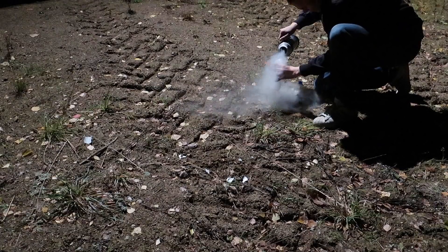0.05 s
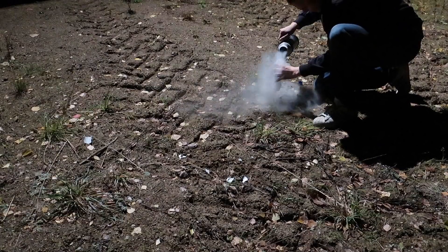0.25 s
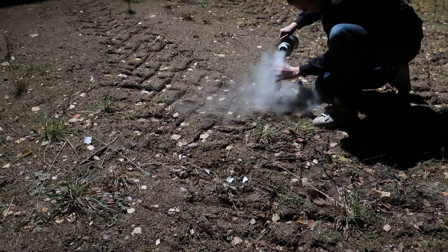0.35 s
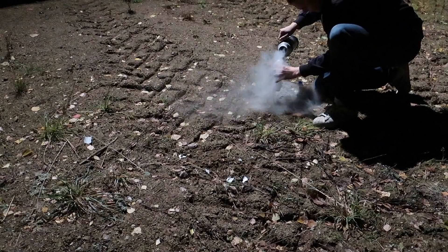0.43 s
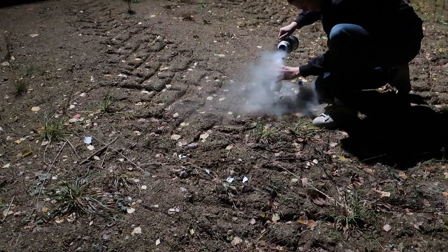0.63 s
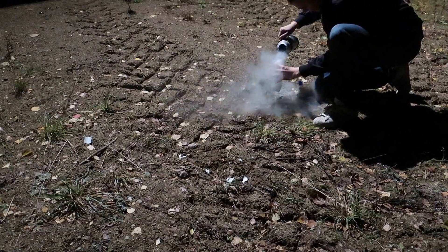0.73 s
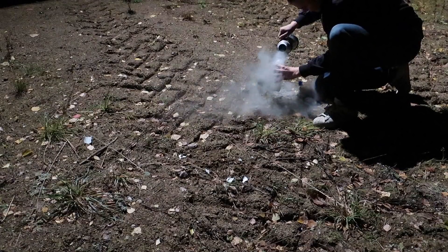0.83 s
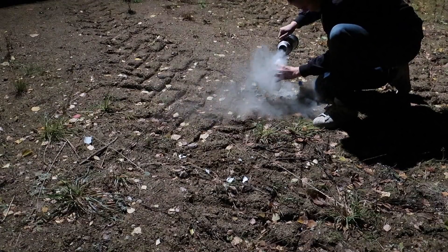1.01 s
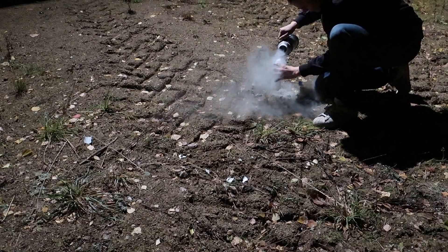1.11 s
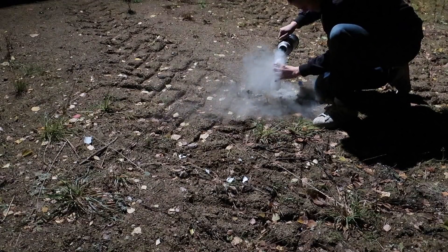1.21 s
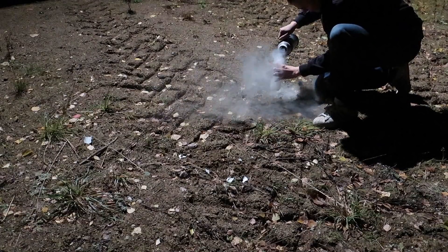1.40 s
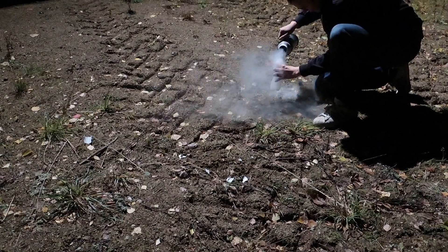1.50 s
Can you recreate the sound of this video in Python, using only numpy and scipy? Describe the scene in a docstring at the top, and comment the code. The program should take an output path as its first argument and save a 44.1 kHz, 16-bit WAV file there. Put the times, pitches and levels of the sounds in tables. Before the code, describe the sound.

A quiet fizzing hiss from boiling cold liquid runs throughout outdoors, with stepped motor buzz close to the microphone; one loud, dry knock comes after a quarter second, followed by low muffled pops and a few light ticks.

```python
"""From the start, cold liquid poured into a bottle outdoors boils with a soft hiss: noise coloured by resonances.
A camera's lens motor whines and buzzes in steps, at most some fifteen a second, made of short dying sines.
Dull little gurgles, brief swings of pressure, and the wide noise of open air also run throughout.
After a quarter of a second a hard rap and its rebounds set the plastic case ringing and rattling.
From about half a second come louder dull pops, then small ticks made of a snap of noise and a short ring."""
import sys
import numpy as np
from scipy import signal
from scipy.io import wavfile
from scipy.ndimage import uniform_filter1d

SR = 44100
rng = np.random.default_rng(int(sys.argv[2]) if len(sys.argv) > 2 else 0)


def to_wav(sig):
    """Store sig (one row per channel, or 1-D mono) as 16-bit WAV at the path in sys.argv[1].

    Samples outside -1..1 are clipped; the rate is SR.
    """
    pcm = np.clip(np.atleast_2d(sig), -1, 1) * 32767
    pcm = np.round(pcm).astype(np.int16)
    wavfile.write(sys.argv[1], SR, pcm.T)  # frames by channels


def voltage_ratio(level):
    """Linear amplitude factor for a level in decibels (scalar or array-like)."""
    return 10 ** (np.asarray(level, float) / 20)


N = 68355  # length in samples

# Strength of the boiling. Each row: time in seconds, level in dB.
BOIL_LEVEL = [(0.0, -56), (0.198, -58), (0.37, -59), (0.975, -64.5), (1.234, -58.5), (1.384, -57.5),
              (1.55, -59)]
# Colour of the boiling hiss. Each row: frequency in Hz, relative strength per Hz in dB.
HISS_COLOUR = [(900, -8.5), (1800, -2), (3000, -2.5), (5000, -5), (8000, -12), (12000, -17.5),
               (15500, -17.5)]
# Bottle resonances. Each row: middle frequency in Hz, width of each filter pass in Hz, relative level in dB.
BOTTLE_RESONANCES = [(2436.5, 320, -9.5), (3403, 296, -4), (4432, 23, -8.5), (5305, 77, -15),
                     (6371, 54, -19)]
# The rap and its rebounds. Each row: start in seconds, level in dB, centre frequency in Hz,
# fall away from the centre in dB per octave.
RAP_BLOWS = [(.2446, -18.5, 4000, 0), (.2463, -17, 3830, 21), (.2495, -27.5, 4170, 6.5),
             (0.2622, -39, 6400, 14.5), (.2640, -56, 4400, 31.5), (.2675, -31, 2890, 13),
             (.2778, -45.5, 4430, 13), (0.278, -51, 2420, 24.5), (0.283, -41, 4200, 0.5),
             (.2872, -41, 6500, 9), (.2905, -40, 2580, -0.5)]
# Ringing modes of the case. Each row: frequency in Hz, relative level in dB,
# time to fall by 60 dB in seconds, left minus right in dB.
CASE_MODES = [(178.8, -14, 0.131, 0.5), (577.4, -9, 0.01895, -0.5), (744, -18, 0.1287, 3),
              (1129, -4, 0.01055, 2), (1522.8, -30.5, 0.181, -11), (2166, -9.5, 0.028, -2.5),
              (2460, -16.5, 0.0323, 0), (2896, -16, 0.0278, 0.5), (3500, -18, 0.0203, 1),
              (3706, -6, 0.014, 3), (4307, -18, 0.015, 12.5), (4567, -13.5, 0.014, -14),
              (5694, -4.5, 0.00437, -5), (6474, -7, 0.0071, -4.5), (8198, -4, 0.00369, 6),
              (10900, -43.5, 0.0041, 3)]
# Motor steps. Each row: start in seconds, level of the buzz in dB, level of the boom before doubling in dB.
MOTOR_STEPS = [(0.014, -55.5, -59.5), (0.079, -48.5, -51.5), (0.148, -48.5, -58.5), (0.281, -45, -80),
               (0.347, -46, -49), (0.424, -59, -77.5), (0.481, -46.5, -53), (0.551, -57, -55),
               (0.6135, -44.5, -50), (0.682, -53.5, -54), (0.747, -48.5, -54.5), (0.819, -57, -55.5),
               (0.947, -48.5, -64), (1.081, -47, -57), (1.147, -44, -52), (1.222, -54.5, -67.5),
               (1.28, -46.5, -51), (1.35, -51, -55), (1.421, -52, -85), (1.482, -52, -55.5)]
# Tones of the buzz. Each row: frequency before scatter in Hz, relative level in dB,
# time to fall by 60 dB in seconds.
BUZZ_TONES = [(495.6, -4, 0.0538), (724.8, 0, 0.0334), (777.5, -2, 0.0617), (1145, -9.5, 0.0432)]
# Dull pops. Each row: start in seconds, level before fading in dB, length of one swing in seconds.
POP_LIST = [(0.5679, -42.5, 0.001406), (0.5861, -46, 0.00189), (0.63, -41.5, 0.00272),
            (0.64, -46.5, 0.00295), (0.7124, -49.5, 0.00308), (0.8955, -52.5, 0.00235),
            (0.941, -41, 0.00288), (0.9914, -47.5, 0.0045), (1.4413, -44.5, 0.00185),
            (1.5475, -47.5, 0.00144)]
# Ticks. Each row: start in seconds, level in dB, ring frequency in Hz,
# strength of the snap as a factor, centre of the snap in Hz.
TICK_LIST = [(0.7141, -50, 4170, 1.43, 5720), (0.7157, -52, 3820, 0.26, 5000),
             (0.8872, -53, 2026, 1.19, 1700), (0.9024, -57.5, 3485, 2.17, 6540),
             (0.9035, -53, 3500, 1.47, 3700), (1.0142, -56, 4050, 1.82, 4560),
             (1.5199, -39.5, 2460, 0.786, 5560), (1.5382, -51, 2418, 0.78, 4740)]
# Colour of the open air. Each row: frequency in Hz, relative strength per Hz in dB.
AIR_COLOUR = [(15, -51.5), (25, -43), (44, -13.5), (183, -1), (482, -4.5), (648, -9.5), (762, -3),
              (919, -16), (1140, -10), (1380, -13.5), (3340, -20), (12800, -26.5), (15500, -29)]
# How alike left and right noise are. Each row: frequency in Hz, likeness from -1 to 1.
LIKENESS = [(30, 0.78), (80, 1), (150, 0.84), (300, -0.82), (700, 0.277), (1400, 0.255), (3000, -0.017),
            (6000, -0.264), (14000, 0.42)]
# Phase between the sides. Each row: frequency in Hz, lead of the left in radians.
LEFT_LEAD = [(60, 1.5), (700, -2), (1300, -9.5), (2000, -1.5), (3400, -2.5), (6000, 11), (9500, 3.5),
             (13000, -5.5)]
# Balance of the noise. Each row: frequency in Hz, left minus right in dB.
BALANCE = [(60, -0.5), (180, 1), (550, 0.5), (1650, 0), (4970, -1), (15000, -0.5)]

# Boiling
FIZZ_PER_S, FIZZ_SPREAD_DB, FIZZ_DB = 2300, 4.5, 1  # bubbles per second, size spread, strength
FLUTTER_DB, FLUTTER_S = 2.5, 0.0208  # size of the flutter, half-length of its smoothing window
WANDER = 0.0251  # typical share by which the resonances drift
# Rap
PORT_LAG_S, RAP_RISE_S = 0.00003, 0.0004  # left hears it later by the lag
CRACK_DB, CRACK_S = 3.5, 0.00007
SPRAY_DB, SPRAY_HZ, SPRAY_HOLD_S = -16.5, 6720, 0.0029
REBOUND_SPREAD_DB, CASE_LOW_HZ = 4, 124.6
RATTLE_DB, RATTLE_T60_S, RATTLE_HZ, RATTLE_WIDTH_HZ, RATTLE_PER_S = -46.5, 0.2244, 3040, 3200, 1600
# Motor
WHINE_HZ, WHINE_WIDTH_HZ, WHINE_DB, WHINE_PAN_DB = 1152.6, 44, -75, -19
STEP_S, WHINE_THROB = 0.06675, 0.99  # the whine swells twice per STEP_S, by this share
BUZZ_PAN_DB, BUZZ_RISE_S = 5, 0.002
BOOM_HZ, BOOM_T60_S, BOOM_RISE_S, BOOM_LAG_S = 166.96, 0.085, 0.00301, 0.00407  # Hz before scatter
JOLT_LAG_S, JOLT_DB, JOLT_SPREAD_DB = 0.006726, -11, 4  # second jolt: dB against the first, before scatter
# Gurgles and ticks
GURGLE_PER_S, GURGLE_DB, GURGLE_SPREAD_DB = 45, -62, 3.5  # dB before scatter
GURGLE_SHORT_S, GURGLE_LONG_S = 0.000842, 0.003296
TICK_T60_S, SNAP_T60_S, SNAP_WIDTH_HZ, TICK_RISE_S = 0.0259, 0.0185, 4830, 0.000366
# Air, and unevenness shared by both wide noises
AIR_DB = -56
PATCH_DB, FLICKER_DB = 1, 0.6


def boiling():
    """Bursting bubbles roughen a hiss, and bottle resonances that flutter and drift colour it."""
    hiss = noise(HISS_COLOUR)
    size = voltage_ratio(FIZZ_SPREAD_DB * np.minimum(rng.exponential(1, N), 5))
    bubbles = size * (rng.random(N) < FIZZ_PER_S / SR)
    fizz = evened(signal.oaconvolve(bubbles, np.hanning(40), "same"))
    hiss = hiss * (1 + voltage_ratio(FIZZ_DB) * fizz)
    # slow random curves: first one of loudness per resonance, then one of pitch
    count = len(BOTTLE_RESONANCES)
    window = np.hanning(int(2 * FLUTTER_S * SR))[None]
    curves = signal.oaconvolve(rng.standard_normal((N, 2 * count)).T, window, "same", axes=1)
    coloured = hiss
    for (hz, width, db), louder, higher in zip(BOTTLE_RESONANCES, curves[:count], curves[count:]):
        drifting_hz = hz * (1 + WANDER * evened(higher))
        tone = evened(resonate_twice(hiss, drifting_hz, width))
        coloured = coloured + voltage_ratio(db + FLUTTER_DB * evened(louder)) * tone
    s, db = np.transpose(BOIL_LEVEL)
    return voltage_ratio(np.interp(np.arange(N) / SR, s, db)) * evened(coloured)


def rap():
    """A blow makes a sharp crack and treble spray, rings the case modes and leaves loose parts rattling."""
    t = np.arange(9000) / SR - np.array([[PORT_LAG_S], [0]])
    start, level_db = RAP_BLOWS[0][:2]
    out = np.zeros((2, N))

    u = (t / CRACK_S - 4) ** 2
    crack = voltage_ratio(CRACK_DB) * (1 - u) * np.exp(-u / 2)
    spray = high_pass(rng.standard_normal((2, 9000)), SPRAY_HZ)
    spray = spray * rise(t, RAP_RISE_S) * np.exp(-(t / SPRAY_HOLD_S) ** 2)
    add(out, start, voltage_ratio(level_db) * (crack + voltage_ratio(SPRAY_DB) * spray))

    scatter = rng.uniform(-0.56, 1, (len(RAP_BLOWS), len(CASE_MODES)))
    for (s, db, centre_hz, fall_db), z in zip(RAP_BLOWS, scatter):
        # only blows after the third get scattered mode levels
        spread_db = REBOUND_SPREAD_DB * z * (s > RAP_BLOWS[2][0])
        modes = 0
        for k, (hz, mode_db, t60, pan_db) in enumerate(CASE_MODES):
            gain_db = mode_db - abs(fall_db * np.log2(hz / centre_hz)) + spread_db[k]
            sense = (-1) ** k  # neighbouring modes start in opposite directions
            modes = modes + sense * voltage_ratio(gain_db) * pan(pan_db) * ring(t, hz, t60)
        add(out, s, voltage_ratio(db) * rise(t, RAP_RISE_S) * modes)

    hits = rng.standard_normal((3, 9000)) * (rng.random(9000) < RATTLE_PER_S / SR)
    rattle = evened(resonate_twice(half_shared(hits), RATTLE_HZ, RATTLE_WIDTH_HZ))
    add(out, start, voltage_ratio(RATTLE_DB - 60 * t / RATTLE_T60_S) * rattle)
    return high_pass(out, CASE_LOW_HZ)


def motor():
    """A throbbing whine of narrow noise; each step jolts the motor into a double buzz and booms the case."""
    t = np.arange(N) / SR
    whine = evened(resonate_twice(rng.standard_normal(N), WHINE_HZ, WHINE_WIDTH_HZ))
    whine = whine * (1 + WHINE_THROB * np.cos(4 * np.pi * t / STEP_S))
    opposite = np.array([[1], [-1]])  # the sides move against each other
    out = voltage_ratio(WHINE_DB) * pan(WHINE_PAN_DB) * opposite * whine

    t = t[:4000]
    pitch_scatter = rng.uniform(0.9374, 1.02, (len(MOTOR_STEPS), len(BUZZ_TONES) + 1))
    jolt_scatter = rng.uniform(-1.43, 1, len(MOTOR_STEPS))
    for (s, db, boom_db), pitch, z in zip(MOTOR_STEPS, pitch_scatter, jolt_scatter):
        tones = sum(voltage_ratio(g) * ring(t, hz * k, t60) for (hz, g, t60), k in zip(BUZZ_TONES, pitch))
        buzz = -tones * rise(t, BUZZ_RISE_S)
        second = np.interp(t - JOLT_LAG_S, t, buzz)
        buzz = buzz + voltage_ratio(JOLT_DB + JOLT_SPREAD_DB * z) * second
        late = t - BOOM_LAG_S
        boom = ring(late, BOOM_HZ * pitch[-1], BOOM_T60_S) * rise(late, BOOM_RISE_S)
        add(out, s, voltage_ratio(db) * pan(BUZZ_PAN_DB) * buzz + 2 * voltage_ratio(boom_db) * boom)
    return out


def pops():
    """Each pop or tiny gurgle is a quickly fading swing of pressure, the same on both sides."""
    out, t = np.zeros((2, N)), np.arange(2000) / SR
    at, size, stretch = rng.random((round(GURGLE_PER_S * N / SR), 3)).T
    gurgle_db = GURGLE_DB - GURGLE_SPREAD_DB * np.log(size + 0.0074)
    gurgle_s = GURGLE_SHORT_S + (GURGLE_LONG_S - GURGLE_SHORT_S) * stretch
    gurgles = list(zip(at * N / SR, gurgle_db, gurgle_s))
    for s, db, length in list(POP_LIST) + gurgles:
        u = t / length
        swing = -np.sin(2 * np.pi * u) * np.exp(-(u / 1.252) ** 2)
        add(out, s, voltage_ratio(db) * np.tile(swing, (2, 1)))
    return out


def ticks():
    """Each tick is a dying snap of noise over two dying tones."""
    out, t = np.zeros((2, N)), np.arange(2000) / SR
    draws = rng.standard_normal((len(TICK_LIST), 3, 2000))
    for (s, db, hz, treble, snap_hz), z in zip(TICK_LIST, draws):
        snap = evened(resonate_twice(half_shared(z), snap_hz, SNAP_WIDTH_HZ))
        snap = snap * voltage_ratio(-60 * t / SNAP_T60_S)
        body = ring(t, hz, TICK_T60_S) - 0.36 * ring(t, 0.83 * hz, TICK_T60_S)
        add(out, s, voltage_ratio(db) * rise(t, TICK_RISE_S) * (body + treble * snap))
    return out


def open_air():
    """The wide wash of open air is steady noise, strongest in the bass."""
    return voltage_ratio(AIR_DB) * noise(AIR_COLOUR)


def noise(colour):
    """Stereo noise built from short overlapping spectra, with drifting patches and a wide flicker."""
    frames, hz = N // 256 + 5, np.fft.rfftfreq(1024, 1 / SR)
    a, b, c, d, patches = rng.standard_normal((frames, 513, 5)).T
    patches = uniform_filter1d(uniform_filter1d(patches, size=12, axis=0), size=8, axis=1)
    flicker = evened(uniform_filter1d(rng.standard_normal(frames), size=3))
    same = np.clip(read(LIKENESS, hz), -1, 1)[:, None]
    right, other = a + 1j * b, c + 1j * d
    turned = right * np.exp(1j * read(LEFT_LEAD, hz))[:, None]
    left = same * turned + np.sqrt(1 - same ** 2) * other
    tilt = voltage_ratio(read(BALANCE, hz) / 2)[:, None]
    level_db = read(colour, hz)[:, None] + PATCH_DB * evened(patches) + FLICKER_DB * flicker
    spectra = np.array([left * tilt, right / tilt]) * voltage_ratio(level_db)
    return evened(signal.istft(spectra, nperseg=1024, noverlap=768)[1][:, :N])


def evened(x):
    """Scales a signal to an rms of 1."""
    return x / np.sqrt(np.mean(x ** 2) + 1e-20)


def read(points, hz):
    """Reads between the rows of a table on a log-frequency axis."""
    f, value = np.transpose(points)
    return np.interp(np.log(hz + 1), np.log(f + 1), value)


def add(mix, s, sound):
    """Adds a stereo sound to the mix, starting at s seconds."""
    part = mix[:, round(s * SR):][:, :sound.shape[1]]
    part += sound[:, :part.shape[1]]


def pan(db):
    """Left and right gains that differ by db."""
    return voltage_ratio(np.array([[db / 2], [-db / 2]]))


def half_shared(z):
    """Makes stereo from three noises: one shared, plus half of another for each side."""
    return z[:1] + 0.5 * z[1:]


def high_pass(x, hz):
    """Removes what lies below hz."""
    return signal.sosfilt(signal.butter(2, hz, "high", fs=SR, output="sos"), x)


def resonate(x, hz, width):
    """A resonance of gain 1: shifts hz down to zero, smooths, and shifts back up."""
    turn = np.exp(2j * np.pi * np.cumsum(hz * np.ones(x.shape[-1])) / SR)
    r = np.exp(-np.pi * width / SR)
    return 2 * (turn * signal.lfilter([1 - r], [1, -r], x / turn)).real


def resonate_twice(x, hz, width):
    """Two passes of the same resonance, for steeper sides."""
    return resonate(resonate(x, hz, width), hz, width)


def ring(t, hz, t60):
    """A sine that starts at t = 0 and falls by 60 dB in t60 seconds."""
    t = np.maximum(t, 0)
    return voltage_ratio(-60 * t / max(t60, 0.002)) * np.sin(2 * np.pi * hz * t)


def rise(t, s):
    """A soft start lasting about s seconds."""
    return 1 - np.exp(-(np.maximum(t, 0) / s) ** 2)


def scene():
    """All sources together, in stereo."""
    return boiling() + rap() + motor() + pops() + ticks() + open_air()


def band_limit(x):
    """A steep low-pass at the top of the band."""
    return signal.sosfilt(signal.butter(12, 15810, fs=SR, output="sos"), x)


def record(dry):
    """Removes the treble above 15.5 kHz with a steep filter."""
    low_pass = signal.firwin(511, 15500, window=("kaiser", 9), fs=SR)
    mix = signal.oaconvolve(dry, low_pass[None], "same")
    return band_limit(mix)


dry = scene()
out = record(dry)
to_wav(out)
```